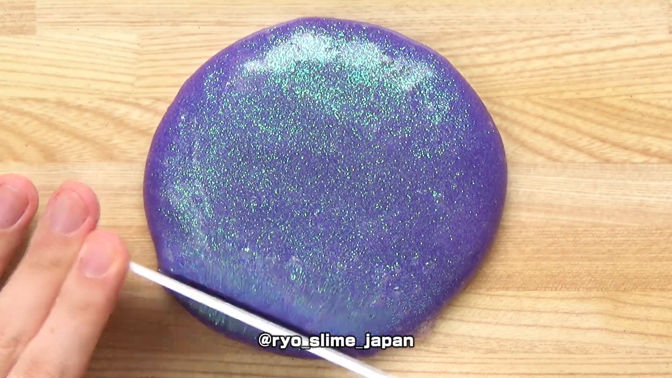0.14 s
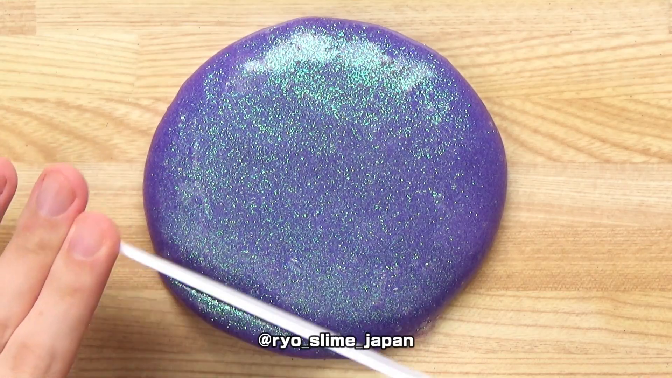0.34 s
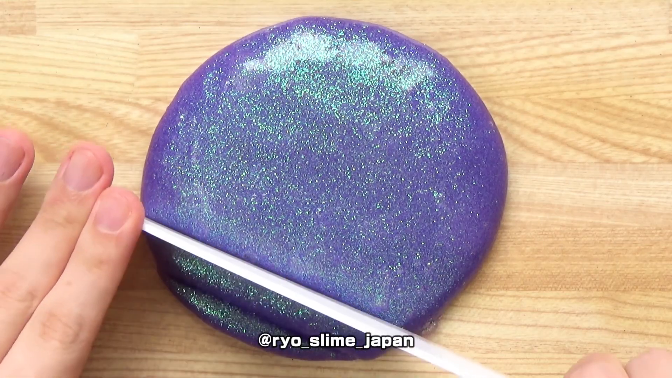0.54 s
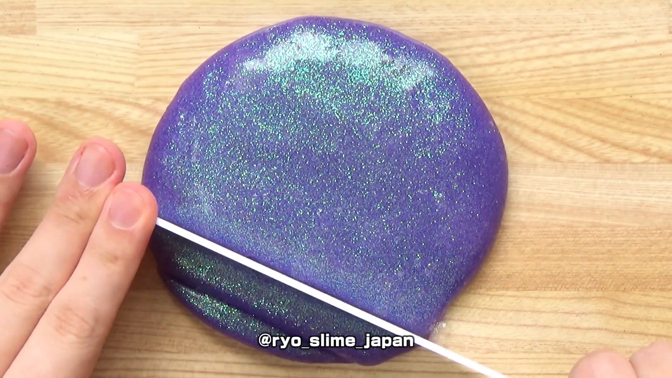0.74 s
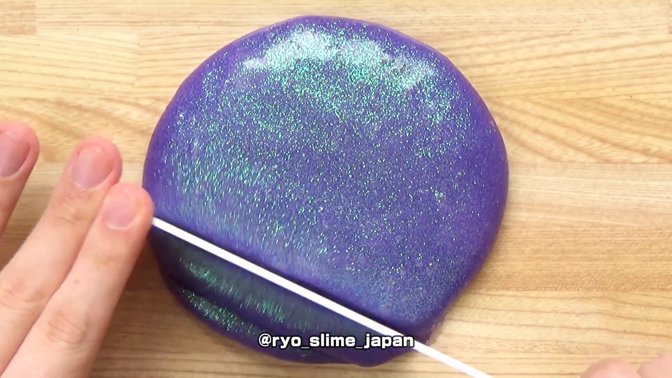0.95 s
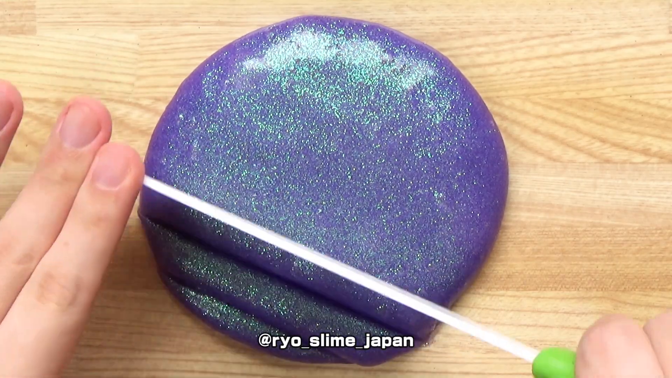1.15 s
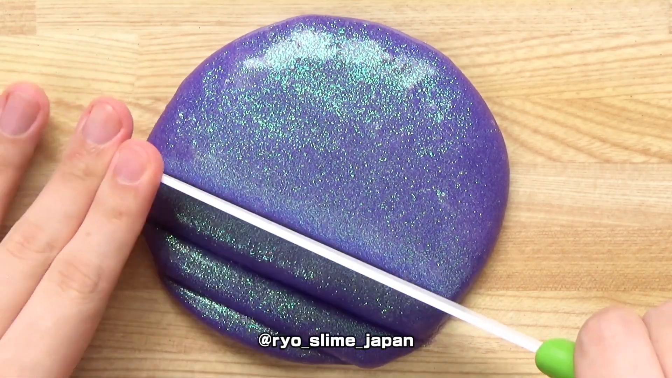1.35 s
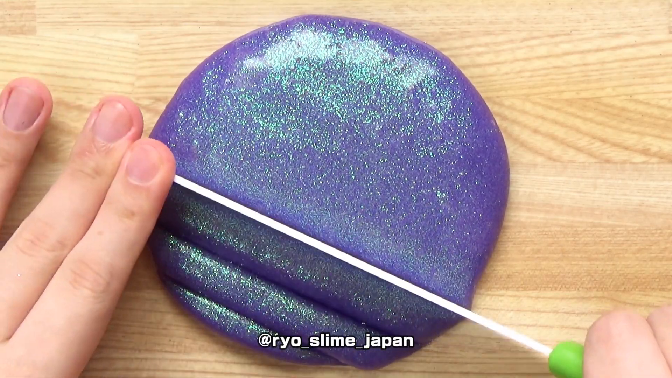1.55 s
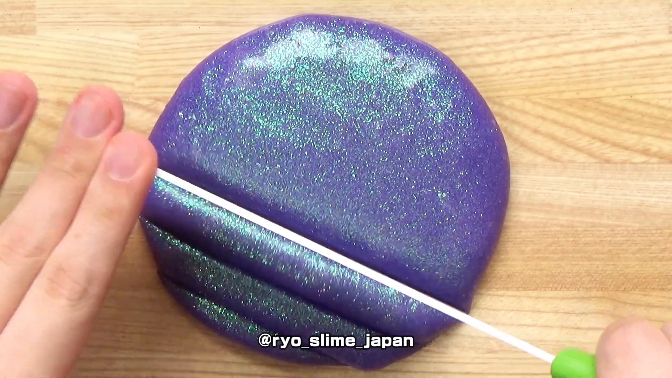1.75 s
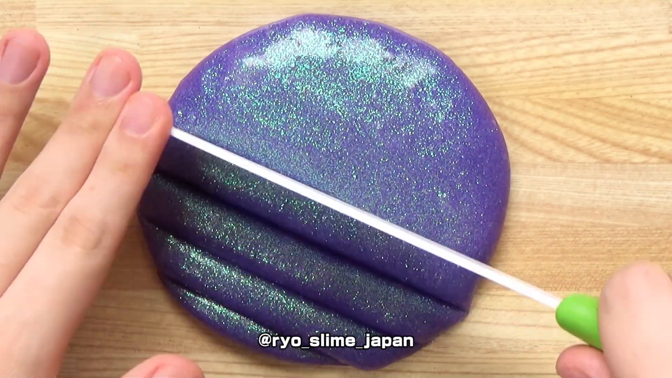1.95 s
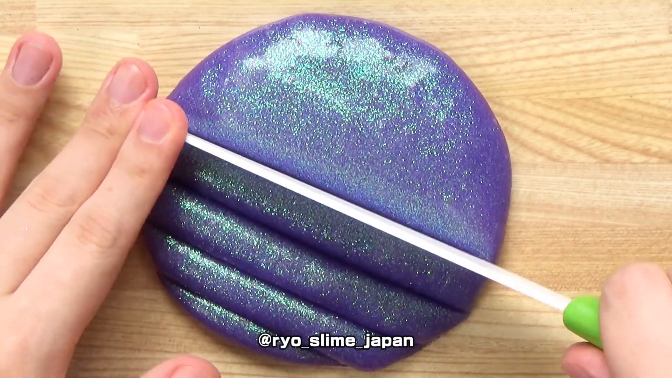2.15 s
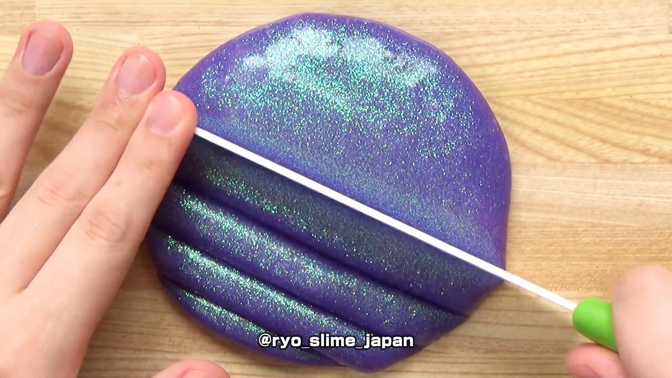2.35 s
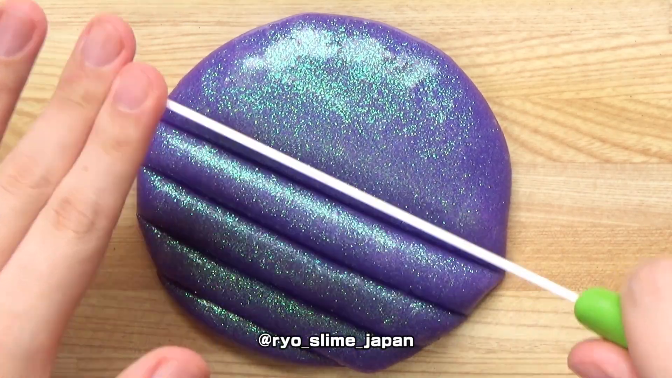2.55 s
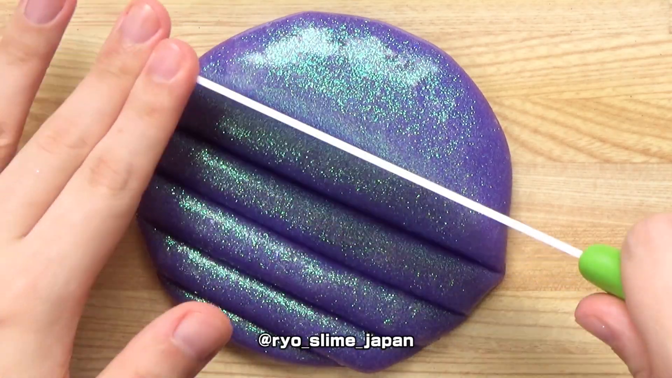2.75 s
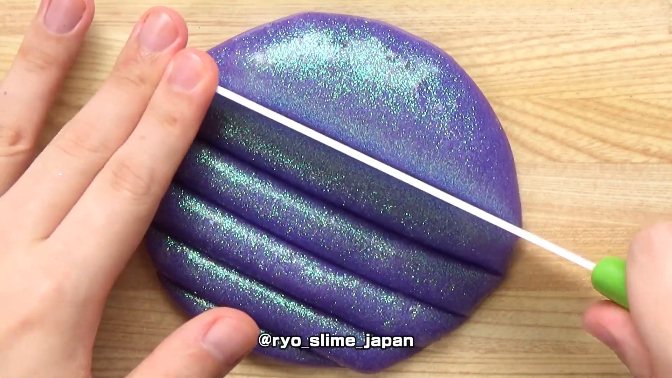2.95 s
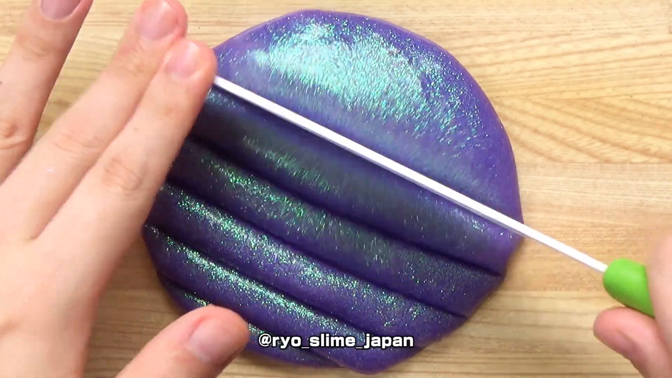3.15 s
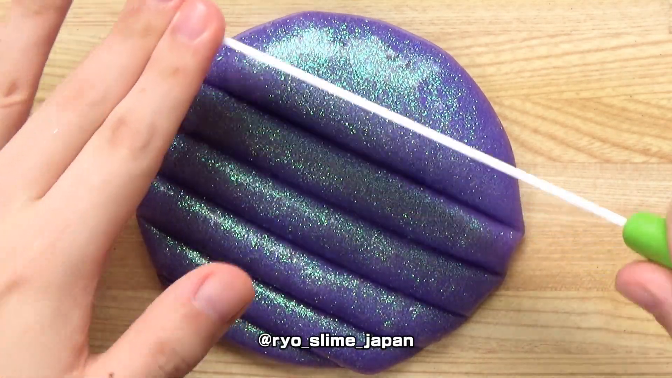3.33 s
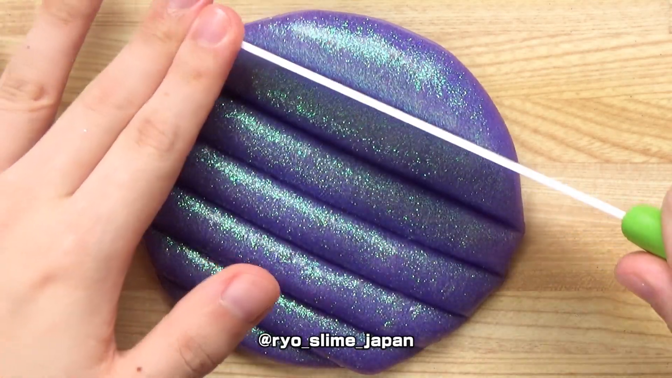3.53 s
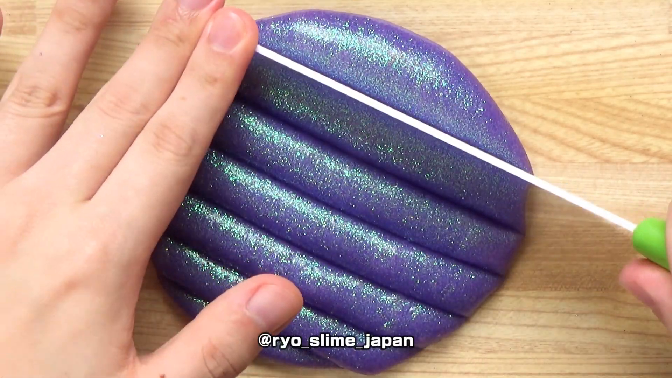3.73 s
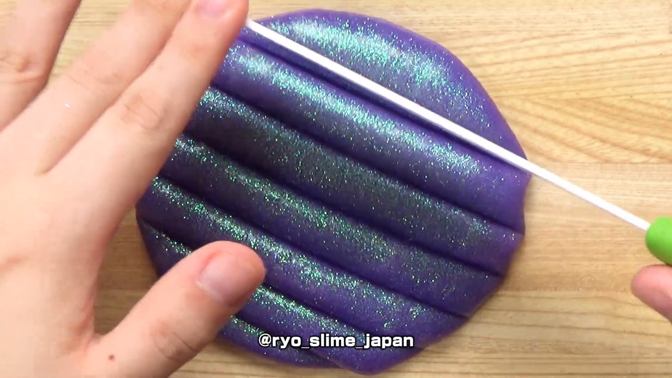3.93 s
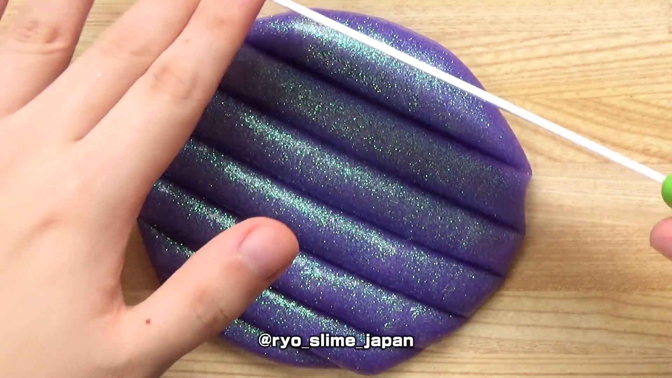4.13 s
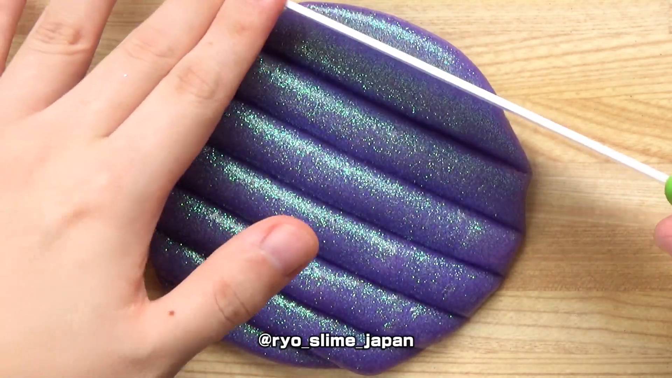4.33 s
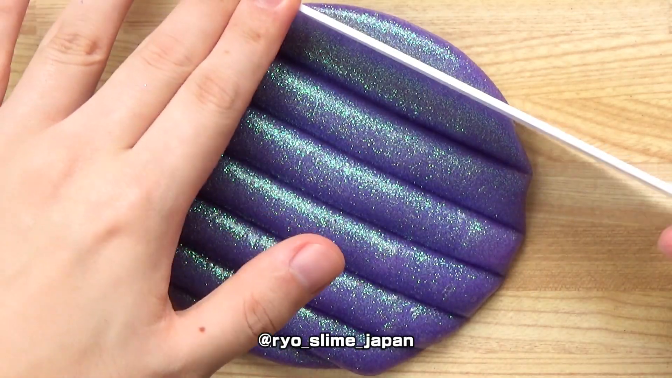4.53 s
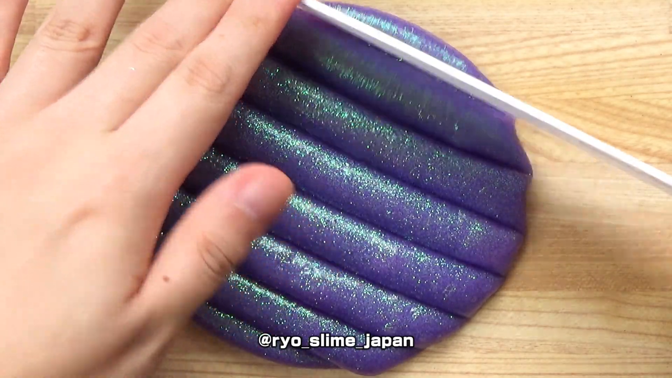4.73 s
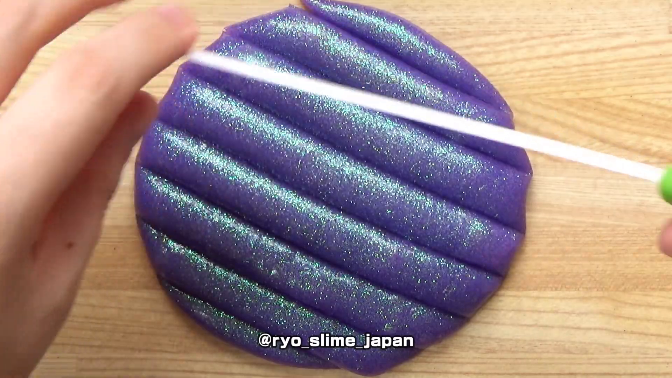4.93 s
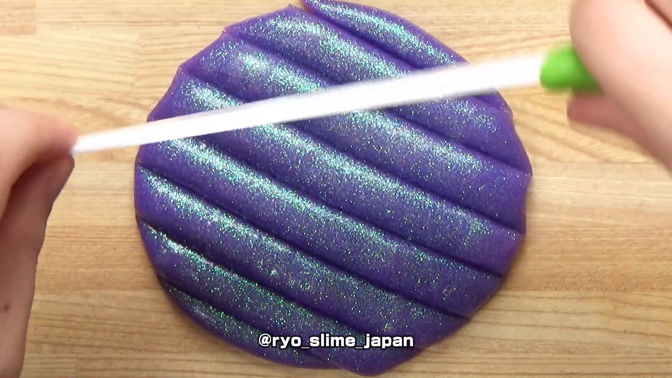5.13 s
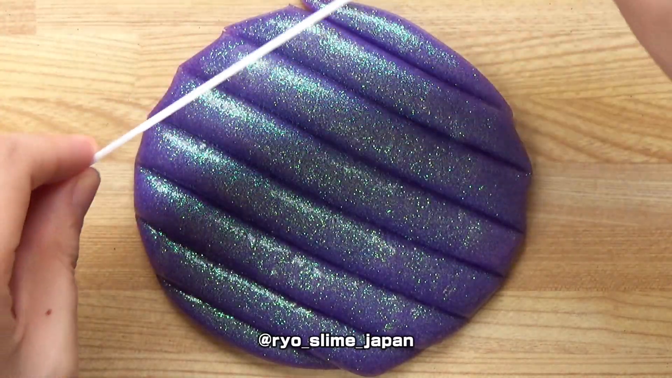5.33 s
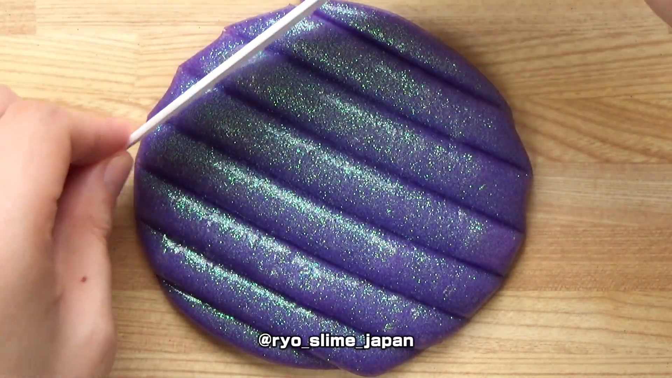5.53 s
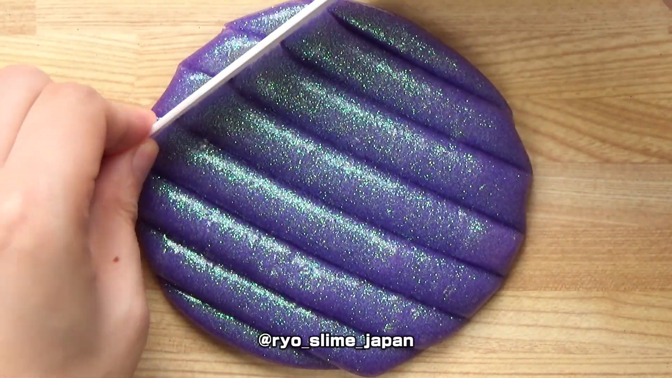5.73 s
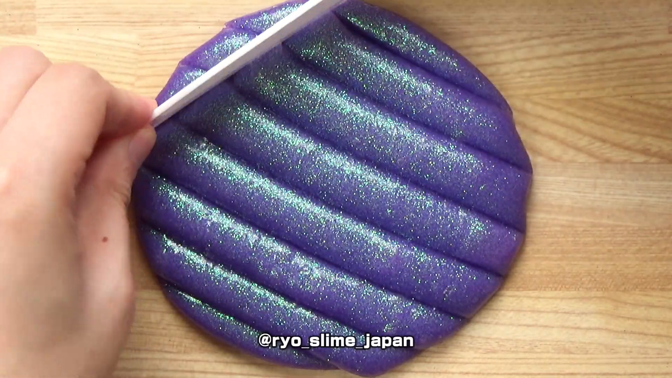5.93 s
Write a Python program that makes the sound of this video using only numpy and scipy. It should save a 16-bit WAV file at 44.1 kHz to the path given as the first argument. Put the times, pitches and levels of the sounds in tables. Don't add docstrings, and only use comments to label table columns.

```python
import sys
import numpy as np
from scipy import signal
from scipy.fft import rfft, irfft
from scipy.io import wavfile
from scipy.ndimage import uniform_filter1d

SR = 44100
rng = np.random.default_rng(int(sys.argv[2]) if len(sys.argv) > 2 else 0)


def volts_from_db(level):
    exponent = np.asarray(level, float) / 20
    return 10 ** exponent


def bounce(signal):
    frames = np.transpose(np.atleast_2d(signal))
    limited = np.clip(frames, -1, 1)
    pcm = np.round(limited * 32767).astype(np.int16)
    wavfile.write(sys.argv[1], SR, pcm)


N = 268128


def white():
    return rng.standard_normal(N)


def rms_one(x):
    return x / np.sqrt(np.mean(x ** 2) + 1e-20)


def in_time(rows, silent=None):
    s, *columns = np.transpose(rows)
    return np.array([np.interp(np.arange(N) / SR, s, c, silent, silent) for c in columns])


def band(x, low_hz, high_hz):
    sos = signal.butter(2, [low_hz, min(high_hz, .45 * SR)], "band", fs=SR, output="sos")
    return signal.sosfilt(sos, x)


def coloured(x, spectrum):
    hz, db = np.transpose(spectrum)
    grid = np.fft.rfftfreq(N, 1 / SR) + 1
    return irfft(rfft(x) * volts_from_db(np.interp(np.log(grid), np.log(hz), db)), N)


def resonate(x, hz, width_hz):
    r = np.exp(-np.pi * width_hz / SR)
    poles = [1, -2 * r * np.cos(2 * np.pi * hz / SR), r * r]
    return signal.lfilter([(1 - r * r) / 2, 0, (r * r - 1) / 2], poles, x)


def drift(rate):
    steps = rng.standard_normal(1000)
    return np.interp(np.arange(N) / SR * rate, np.arange(1000), steps)


def pair(alike, draw):
    alike = np.clip(alike, -1, 1)
    shared = np.sqrt((1 + alike) / 2) * draw()
    return shared + np.sqrt((1 - alike) / 2) * draw() * [[1], [-1]]


def panned(x, left_db):
    return x * volts_from_db(np.array([[.5], [-.5]]) * left_db)


def add(out, s, x):
    at = round(s * SR)
    out[:, at:at + x.shape[1]] += x[:, :N - at]


def grains(per_s, uneven_db):
    sizes = volts_from_db(uneven_db * np.minimum(rng.exponential(1, N), 4)) * rng.choice([-1, 1], N)
    return rms_one(sizes * (rng.random(N) < per_s / SR))


def swell(s, db, rise_s, rise_db, fade_db_per_s):
    t = np.arange(N) / SR - s
    return np.where(t < -rise_s, -150, db + np.where(t < 0, rise_db * t / rise_s, -fade_db_per_s * t))


# pitch_hz, density_db (per Hz)
HUM_SPECTRUM = [(59, -36), (100, 4.5), (188, -11), (268, -5), (375, -10), (594, -11), (797, -16),
                (1290, -11), (1400, -16.5), (1840, -31.5), (2090, -35), (3610, -51), (15000, -70)]


def hum():
    rumble = volts_from_db(-43.5) * rms_one(band(pair(0.11, white), 15, 110))
    return rumble + volts_from_db(-53) * rms_one(coloured(pair(0.86, white), HUM_SPECTRUM))


def room(x):
    t60_s, level_db, wall_cut_hz = 0.058, -17.5, 3900
    t = np.arange(SR // 3) / SR
    tail = rng.standard_normal((2, len(t))) * volts_from_db(-60 * t / t60_s) * (t > .004)
    tail = band(tail, 130, wall_cut_hz)
    tail = tail / np.sqrt(np.sum(tail ** 2, axis=1, keepdims=True))
    return volts_from_db(level_db) * signal.fftconvolve(x, tail, axes=1)[:, :N]


# start_s, boom_db, build_up_s, fading_db_per_s
LOAD_RELEASES = [(0.001, -12.5, .05, 282.5), (0.2, -17, 0.16, 76.5), (0.998, -19, 0.15, 361),
                 (1.71, -19.5, 0.093, 124), (2.518, -21, 0.49, 252.5), (3.199, -28, 0.3, 210.5),
                 (3.928, -19, 0.19, 203.5), (4.788, -17, 0.081, 257), (5.25, -41, .2, 24.5),
                 (5.691, -34.5, 0.48, 86), (6.028, -21, 0.32, 337)]


def table_load():
    lifts = np.max([swell(s, db, rise_s, 13.5, fade) for s, db, rise_s, fade in LOAD_RELEASES], axis=0)
    held, landings = [], []
    for s, length, _, db, _ in BLADE_PRESSES:
        load = [(s - TOUCH_S, db - 28.5), (s, db), (s + length + .1, db), (s + length + .2, db - 20)]
        held.append(in_time(load, silent=-150)[0])
        landings.append(swell(s, -19, TOUCH_S, 22, 125))
    boom_db = np.maximum(lifts, np.max(held, axis=0) - 6.5)
    wood_db = np.maximum(lifts - 10, np.max(landings, axis=0))
    return boom_db, wood_db


# pitch_hz, width_hz, level_db, left_right_likeness
LOW_MODES = [
    (35, 2.4, -10, 0.056),
    (66, 6.2, -3.5, 0.28),
]
# start_s, peak_db, pitch_hz, left_right_db, ring_db (against peak)
TABLE_BLOWS = [
    (0.2, -3, 62, -3, -18),
    (1, -10, 68.4, -4, -17),
    (1.731, -20, 79.7, 1.5, -6.5),
    (2.49, -16, 100, -7, -7),
    (3.181, -8.5, 60, -3.5, -11),
    (3.928, -1.5, 62, 3, -16.5),
    (4.77, -11, 60, 2, -9.5),
    (5.04, -25, 60.4, -5, -40),
    (6.005, -7, 70, -13, -39),
]


def table():
    boom_db, wood_db = table_load()
    boom = sum(volts_from_db(db) * rms_one(resonate(pair(alike, white), hz, width_hz))
               for hz, width_hz, db, alike in LOW_MODES)
    wood = band(pair(.1, white), 110, 300)
    out = panned(volts_from_db(boom_db - 2.0) * rms_one(boom) + volts_from_db(wood_db - 3.0) * rms_one(wood), -1.0)
    t = np.arange(SR // 3) / SR
    ear_phase = np.array([[.6], [0]])
    for s, db, hz, left_db, ring_db in TABLE_BLOWS:
        turns = hz * t + 0.2 * (1 - np.exp(-t / 0.004))
        push = -np.sin(2 * np.pi * turns + ear_phase) * volts_from_db(-60 * t / 0.09) * (1 - np.exp(-t / .004))
        ring = -np.sin(2 * np.pi * 71 * t) * volts_from_db(ring_db - 60 * t / 0.49) * (1 - np.exp(-t / 0.021))
        add(out, s, panned(volts_from_db(db + 2.5) * (push + ring), left_db))
    return out


def whistle():
    hz, width_hz, level_db = 5460, 200, -88
    note = resonate(resonate(pair(.3, white), hz, width_hz), hz, width_hz)
    carried_db = np.max([swell(s - .1, 0, .25, 25, 150) for s, *_ in BLADE_PRESSES[5:]], axis=0)
    return volts_from_db(level_db + carried_db + 4 * drift(12)) * rms_one(note)


# start_s, rustle_db, rub_db, fading_db_per_s
FINGER_TURNS = [
    (5.035, -58, -80.5, 903),
    (5.089, -38, -41.5, 435),
    (5.201, -59, -51, 299),
    (5.25, -57.5, -53.5, 300),
    (5.3, -50.5, -48.5, 298),
    (5.4, -70, -54, 39),
    (5.66, -61, -56.5, 100.5),
]


def finger_moves():
    reach = np.max([swell(s - TOUCH_S, 0, .14, 30.5, 2000) for s, *_ in BLADE_PRESSES], axis=0)
    moves = [swell(s, 0, 0.027, 28, fade) + [[rustle_db], [rub_db]]
             for s, rustle_db, rub_db, fade in FINGER_TURNS]
    reach_rustle_db, reach_rub_db = -68.5, -46.5
    return np.max(moves + [reach + [[reach_rustle_db], [reach_rub_db]]], axis=0)


def fingers():
    patches = volts_from_db(1.84 * drift(36))

    def dry_grains():
        return pair(0.19, lambda: grains(6600, 1.3)) * patches

    rustle_db, rub_db = finger_moves()
    rustle = rms_one(band(band(dry_grains(), 4500, 16000), 4500, 18000))
    rub = rms_one(band(dry_grains(), 610, 3300))
    return volts_from_db(rustle_db - 0.5) * rustle + volts_from_db(rub_db - 8) * rub


def slit_ring():
    out, wet = 0, pair(.8, lambda: grains(900, 3.0))
    for s, length, deepest, db, groove_hz in BLADE_PRESSES[1:]:
        sing_db = swell(s + TOUCH_S, db - 7, TOUCH_S, 18, 45)
        choked_db = swell(s + length, 0, SR, 0, 2000)
        hz = max(1750, 2.85 * groove_hz if groove_hz < 800 else 0)
        out = out + volts_from_db(sing_db + choked_db) * rms_one(resonate(wet, hz, 60))
    return panned(out, -2.0)


BURST_LAG_S = .003
# start_s, peak_db
FILMS_SINKING = [(0.3539, -39), (0.6045, -39.5), (0.6634, -17), (0.6863, -18.5), (0.6965, -11),
                 (0.7662, -19.5), (1.4763, -24), (1.508, -5.5), (1.5237, -16), (2.1113, -28),
                 (2.1281, -7.5), (2.166, -16), (2.2027, -19), (2.2272, -24.5), (2.2493, -19), (2.9793, -12),
                 (3.0096, -20.5), (3.04, -14), (3.6028, -15.5), (3.7503, -11), (3.795, -16.5),
                 (4.4564, -9.5), (4.4916, -14), (4.5342, -20.5), (4.6112, -11.5)]
# start_s, peak_db
FILMS_TEARING = [(0.137, -12), (0.165, -9), (0.911, -19), (0.9478, -18), (1.6776, -12.5), (2.378, -23),
                 (2.4029, -15.5), (2.4167, -25.5), (2.4432, -13.5), (2.4596, -11.5), (2.4741, -5.5),
                 (3.1313, -50.5), (3.8591, -6.5), (3.8807, -12), (4.698, -15.5), (4.7064, -18.5),
                 (4.726, -11), (4.7501, -2.5), (4.7976, -13.5), (5.9554, -27), (5.9776, -26), (5.9933, -21),
                 (6.0125, -9.5), (4.781, -22.5)]


def snaps():
    out, t = np.zeros((2, N)), np.arange(SR // 40) / SR
    films = FILMS_SINKING + FILMS_TEARING
    for (s, db), noise in zip(films, rng.standard_normal((len(films), 2, SR // 40))):
        burst = (noise[0] + .5 * noise[1] * [[1], [-1]]) * volts_from_db(db - 5 - 60 * t / 0.011)
        add(out, s + BURST_LAG_S / 2, band(burst, 2600, 12000))
    return out


# start_s, peak_db, pitch_hz, crack_db, crack_pitch_hz
LANDING_SMACKS = [(0.624, -19, 220, -61, 1820), (0.642, 1.5, 571, -20, 1563),
                  (1.415, -0.5, 247, -39.5, 1748), (1.434, 1.5, 584, -9.5, 1780),
                  (2.117, -16, 338, -16, 1720), (2.131, 1, 627, -19, 1750), (2.874, 0.5, 860, -8, 1900),
                  (2.886, -10.5, 518, -12.5, 2150), (3.599, -10.5, 320, -12.5, 1410),
                  (3.612, 0, 674, -17, 1900), (4.413, -13, 309, -22, 1800), (4.419, 2, 268, -11.5, 1845),
                  (5.736, -7.5, 223, -4, 1417), (5.744, 1, 630, -9.5, 1660)]
# start_s, peak_db, pitch_hz, crack_db, crack_pitch_hz
SUCTION_BREAKS = [(0.107, -12.5, 554, -32, 1980), (0.134, 1, 260, -15, 3840), (0.166, -5.5, 202, 2.5, 1356),
                  (0.888, -31, 261, -7.5, 2580), (0.907, -10.5, 277, -11.5, 2275),
                  (1.677, 6.5, 789, -17, 3450), (2.417, -5.5, 835, -9, 1400), (2.458, -10, 766, -16, 3348),
                  (2.478, 2.5, 325, -18, 3290), (3.131, -7.5, 810, -5, 1910),
                  (3.856, -4.5, 1084, -18.5, 2373), (3.949, -22, 257, -10.5, 1500),
                  (4.694, -5.5, 202, -20.5, 1603), (4.73, -7.5, 1640, -7, 3500),
                  (5.948, -11.5, 202, -28.5, 3140), (5.977, -18, 202, 1, 2940)]
# start_s, peak_db, pitch_hz, crack_db, crack_pitch_hz
AIR_POCKETS = [(0.053, -13.5, 1255, -11, 2220), (0.591, -24.5, 580, -6.5, 3700),
               (0.684, -12, 800, -3, 1840), (0.762, -16, 863, -0.5, 3830),
               (1.332, -24.5, 1150, -57.5, 1770), (1.378, -12.5, 1065, -27, 1490),
               (1.508, 0, 1890, -11.5, 2930), (1.596, -16, 775, -9, 3990), (2.166, -9.5, 1805, -11, 1740),
               (2.802, -37.5, 214, -10, 1730), (3.75, -14, 1314, -11.5, 1530),
               (3.803, -14, 1220, -12.5, 2660), (4.349, -13.5, 1130, 0, 2655),
               (4.451, -3.5, 940, -7.5, 1650), (4.601, -14, 1300, -9.5, 2400),
               (4.959, -30, 239.5, -14.5, 1456), (5.081, -30, 1367, -23.5, 1387),
               (5.639, -31, 229, -8, 1460)]


def pops():
    out, t = np.zeros((2, N)), np.arange(SR // 10) / SR
    kinds = (LANDING_SMACKS, 0.048), (SUCTION_BREAKS, 0.021), (AIR_POCKETS, 0.017)
    bursts = sorted((*row, t60) for rows, t60 in kinds for row in rows)
    luck = rng.standard_normal((len(bursts), 2))
    cracks = rng.standard_normal((len(bursts), 2, SR // 10))
    for (s, db, hz, crack_db, crack_hz, t60), odd, noise in zip(bursts, luck, cracks):
        fade = volts_from_db(-60 * t / min(t60, 22 / hz)) * (1 - np.exp(-t * hz / .25))
        turns = hz * (0.924 * t + 5.0 * t * t)
        neighbour = np.sin(2 * np.pi * turns * (1.5 + 0.21 * odd[0]) + odd[1])
        ring = np.sin(2 * np.pi * turns) + volts_from_db(-8.0) * neighbour
        noise = noise[0] + 0.13 * noise[1] * [[1], [-1]]
        slap = band(noise * volts_from_db(-60 * t / 0.019), 0.19 * hz, 1.98 * hz)
        slap = slap * np.sqrt(1000 / hz) * volts_from_db(4.0)
        raw = noise * volts_from_db(crack_db - 60 * t / 0.013)
        crack = volts_from_db(15) * resonate(raw, crack_hz, 0.25 * crack_hz)
        crack += volts_from_db(6) * resonate(raw, 1.3 * crack_hz, 0.21 * crack_hz)
        crack += volts_from_db(-2.5) * band(band(raw, 1100, 5000), 600, 5500)
        deep = panned(-ring * fade + slap, -6.0)
        add(out, s + BURST_LAG_S, volts_from_db(db - 6) * (deep + panned(crack, -1.4)))
    return out


def hollow(pitch_hz, low_hz, high_hz, floor_db):
    out, power = 0, 0
    wet = [pair(.75, lambda: grains(1600, 2.0)) for k in range(3)]
    for k, hz in enumerate(np.geomspace(low_hz, high_hz, num=10)):
        near_db = np.maximum(-50 * np.abs(np.log2(hz / pitch_hz)), floor_db)
        near = volts_from_db(near_db + 4.5 * drift(35))
        out = out + near * rms_one(resonate(wet[k % 3], hz, 0.13 * hz))
        power = power + near ** 2
    return out / np.sqrt(power)


TOUCH_S = 0.016
# landing_s, length_s, deepest_after_s, strength_db, groove_pitch_hz (at landing)
BLADE_PRESSES = [
    (-0.2, 0.2395, 0.11, -22, 700),
    (0.629, 0.24, 0.096, -26, 626),
    (1.413, 0.21, 0.078, -26, 574),
    (2.121, .222, 0.12, -24.5, 560),
    (2.872, 0.186, .1, -29.5, 733),
    (3.607, .16, 0.088, -26, 751),
    (4.416, 0.21, 0.082, -24.5, 743),
    (5.737, 0.16, 0.16, -23.5, 820),
]


def press_rows(s, length, deepest, db, hz):
    t = np.array([-TOUCH_S, 0, deepest, length, length + .01, length + .08])
    sag_db = -51 * max(length - deepest, 0)
    contact_db = np.array([-36.5, 0, 0, 0, -12, -17.5])
    effort_db = np.array([-11, -11, 0, sag_db, sag_db, sag_db])
    fizz_db = -6.5 + 2.2 * effort_db
    body_db = 3 - 15.5 * t
    levels = db + contact_db + [effort_db, fizz_db, body_db]
    groove_hz, slit_hz = hz + 1500 * t, 1800 + 2700 * t
    return np.transpose([s + np.maximum.accumulate(t), *levels, groove_hz, slit_hz])


# ripping_from_s, free_s, strength_db, fizz_db, body_db (both against strength)
BLADE_TEARS = [
    (0.158, 0.181, -15, -5.5, -7.5),
    (0.947, 0.97, -21.5, -6.5, -3),
    (1.695, 1.734, -26.5, -0.5, 13.5),
    (2.421, 2.489, -24.5, 7, 4.4),
    (3.15, 3.178, -20, -8, 5),
    (3.878, 3.91, -22.5, -4.5, -2.5),
    (4.723, 4.76, -21, 1, -10),
    (5.97, 6.006, -26.5, 0, -4),
]


def tear_rows(s, free, db, fizz_db, body_db):
    t = [s - 0.03, s, free, free + 0.0027, free + 0.044]
    effort_db = db + np.array([-29.5, -6.5, 0, -19.5, -40])
    groove_hz = 760 + 230 * np.array([0.45, 0.13, 0.84, 0.72, 0.9])
    slit_hz = np.full(len(t), 2030)
    return np.transpose([t, effort_db, effort_db + fizz_db, effort_db + body_db, groove_hz, slit_hz])


# pitch_hz, width_hz, level_db
SMALL_CAVITIES = [
    (2773, 310, -6),
    (3440, 150, -6.5),
    (3800, 450, -2.5),
    (4320, 290, -9.5),
]
# pitch_hz, density_db (per Hz)
FIZZ_SPECTRUM = [(710, -39), (1200, -1), (1770, 0.5), (1930, -20.5), (2920, 1.5), (5780, -11.5),
                 (8630, -11), (16000, -24)]


def squelch():
    level, pitch = np.zeros((3, N)), np.full((2, N), 1000.)
    for rows in [press_rows(*row) for row in BLADE_PRESSES] + [tear_rows(*row) for row in BLADE_TEARS]:
        now = in_time(rows)
        on = slice(max(round(rows[0][0] * SR), 0), round(rows[-1][0] * SR))
        level[:, on] = np.maximum(level[:, on], volts_from_db(now[:3, on]))
        pitch[:, on] = now[3:, on]
    level[2] = np.minimum(level[2], volts_from_db(-23))
    slips = volts_from_db(2.92 * drift(90))
    middle, top, body = uniform_filter1d(level, size=120) * slips
    groove_hz, slit_hz = pitch
    wet = pair(.7, lambda: grains(1400, 4.0))
    small = sum(volts_from_db(db + 5 * drift(25)) * rms_one(resonate(wet, hz, width_hz))
                for hz, width_hz, db in SMALL_CAVITIES)
    fizz = coloured(pair(.75, lambda: grains(4000, 4.6)), FIZZ_SPECTRUM)
    slit = hollow(slit_hz, 1500, 2600, floor_db=-10.5)
    out = middle * (volts_from_db(-11.0) * rms_one(small) + volts_from_db(-8.5) * slit)
    restless = sum(volts_from_db(2.5 * drift(55)) * band(fizz, hz, 1.4 * hz) for hz in np.geomspace(870, 3600, num=5))
    out += middle * volts_from_db(-7.5) * rms_one(restless)
    out += top * volts_from_db(0.5 + 1.6 * drift(140)) * rms_one(band(fizz, 4600, 17000))
    out += body * volts_from_db(-4.5) * hollow(groove_hz, 480, 1334, floor_db=-14.5)
    return panned(out, 0.078)


def scene():
    slime = squelch() + pops() + snaps() + fingers() + slit_ring()
    slime[0] = np.roll(slime[0], 1)
    return slime + room(slime) + table() + hum() + whistle()


def top_cut(x):
    return signal.sosfilt(signal.butter(12, 16660, fs=SR, output="sos"), x)


def record(dry):
    low_pass = signal.cheby2(10, 50, 16900, fs=SR, output="sos")
    mix = signal.sosfilt(low_pass, np.clip(dry, -.9, .9))
    return top_cut(mix)


dry = scene()
out = record(dry)
bounce(out)
```